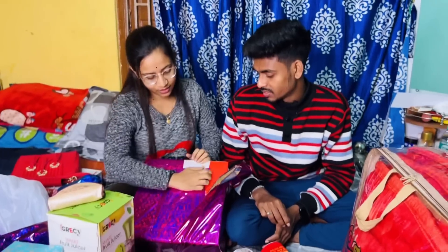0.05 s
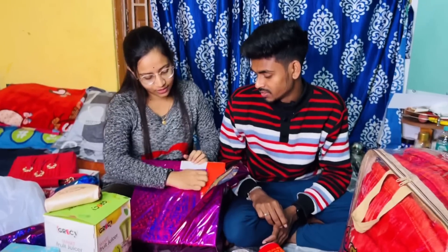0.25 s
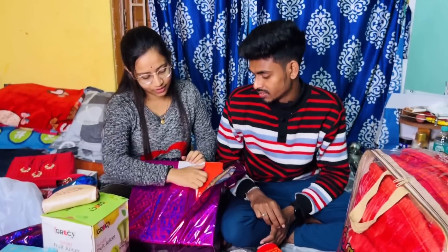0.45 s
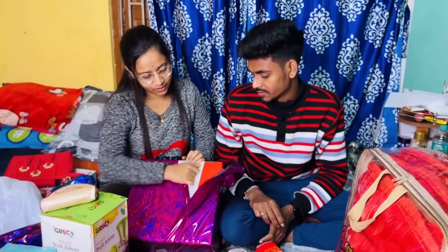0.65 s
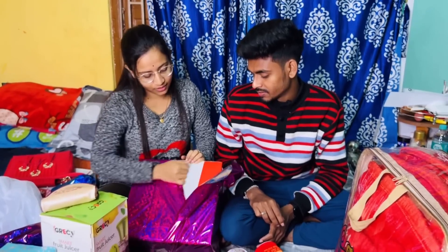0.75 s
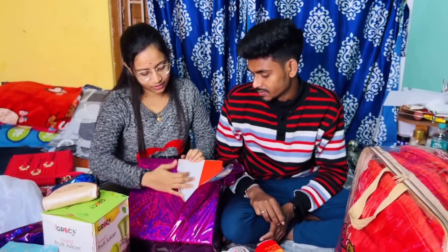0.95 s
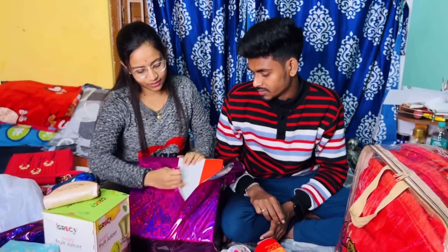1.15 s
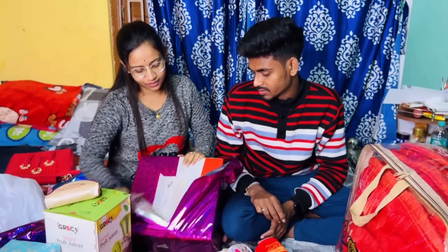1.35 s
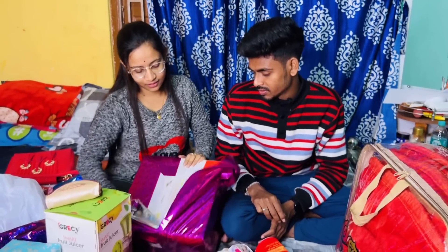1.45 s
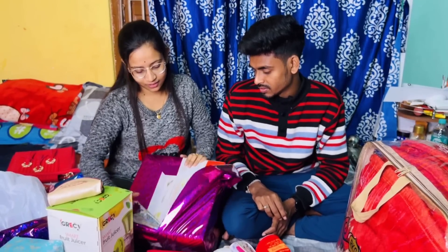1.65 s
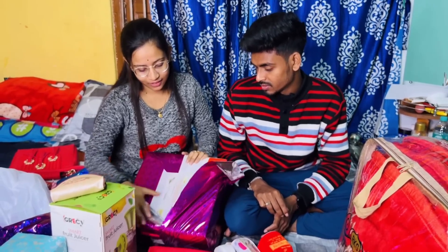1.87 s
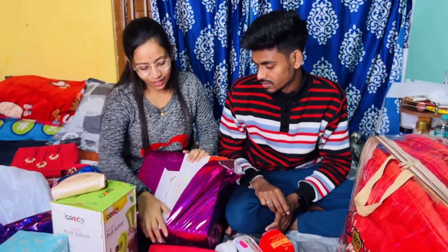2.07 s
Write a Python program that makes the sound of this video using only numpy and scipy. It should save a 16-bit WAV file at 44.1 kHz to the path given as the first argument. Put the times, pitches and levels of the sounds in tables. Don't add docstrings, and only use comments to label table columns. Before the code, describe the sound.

Foil gift wrap crinkles, snaps and tears sharply over soft box thumps in a small room

```python
import sys
import numpy as np
from scipy import signal
from scipy.fft import rfft, irfft
from scipy.io import wavfile

SR = 44100
rng = np.random.default_rng(int(sys.argv[2]) if len(sys.argv) > 2 else 0)


def unload_audio(sound):
    columns = np.transpose(np.atleast_2d(sound))
    steps = np.round(np.clip(columns, -1, 1) * 32767)
    wavfile.write(sys.argv[1], SR, steps.astype(np.int16))


def volts_from_decibels(level):
    exponent = np.asarray(level, float) / 20
    return 10 ** exponent


N = 93051
CLUMP_DB = 4


def rms_one(x):
    return x / np.sqrt(np.mean(x ** 2) + 1e-20)


def in_time(rows):
    s, *columns = np.transpose(rows)
    return [np.interp(np.arange(N) / SR, s, column) for column in columns]


def at_hz(points, hz):
    points_hz, values = np.array(points).T
    return np.interp(np.log(hz), np.log(points_hz), values)


def drift(rate_hz):
    r = np.exp(-2 * np.pi * rate_hz / SR)
    wander = signal.lfilter([1], [1, -2 * r, r * r], rng.standard_normal(N + SR))
    return rms_one(wander[SR:])


def ring(clicks, hz, t60_s):
    r = volts_from_decibels(-60 / (t60_s * SR))
    w = 2 * np.pi * hz / SR
    return signal.lfilter([0, np.sin(w)], [1, -2 * r * np.cos(w), r * r], clicks + 1e-18)


def high_pass(x, order, hz):
    return signal.sosfilt(signal.butter(order, hz, "high", fs=SR, output="sos"), x)


def colour(x, spectrum):
    hz = np.maximum(np.arange(N // 2 + 1) * SR / N, 10)
    lowest_hz, lowest_db = spectrum[0]
    points = [(lowest_hz / 2, lowest_db - 12)] + list(spectrum)
    return rms_one(irfft(rfft(x) * volts_from_decibels(at_hz(points, hz)), N))


def room_tone():
    # (frequency [Hz], density [dB per Hz])
    air_spectrum = [(60, -3), (100, 1), (200, -0.5), (350, 2.5), (600, -5), (1300, -12), (4000, -17.5),
                    (15000, -26.5)]
    return volts_from_decibels(-55 + 0.21 * drift(10)) * colour(rng.standard_normal(N), air_spectrum)


def room(x, cut_s):
    # (frequency [Hz], decay time T60 [s])
    room_decay = [(150, .4), (1000, .33), (4000, .33), (8000, .29), (15000, .21)]
    gap_s, build_s = 0.0027, 0.0074
    edges_hz = 60 * 2 ** np.arange(0, 8.3, 1 / 3)
    t = np.arange(SR) / SR
    white = rng.standard_normal((2, SR))
    tail = 0
    for k, (low, high) in enumerate(zip(edges_hz, edges_hz[1:])):
        band_pass = signal.butter(2, [low, high], "band", fs=SR, output="sos")
        band = signal.sosfilt(band_pass, white[k % 2])
        tail = tail + band * volts_from_decibels(-60 * t / at_hz(room_decay, np.sqrt(low * high)))
    tail = tail * np.clip((t - gap_s) / build_s, 0, 1) * np.clip((cut_s - t) / .01, 0, 1)
    return signal.fftconvolve(x, tail / np.sqrt(np.sum(tail ** 2)))[:N]


def slide():
    # (time [s], level [dB])
    drag = [
        (0, -58),
        (.03, -48.5),
        (.065, -38),
        (.13, -42),
        (.245, -56.5),
        (.26, -82),
    ]
    # (frequency [Hz], density [dB per Hz])
    cloth_spectrum = [(120, -29), (200, -14), (414, -8), (542, -13.5), (690, -9), (1060, -9), (5000, -28.5),
                      (6500, -57), (11000, -120)]
    level_db, = in_time(drag)
    return volts_from_decibels(level_db + 1.3 * drift(72)) * colour(rng.standard_normal(N), cloth_spectrum)


def thuds():
    # (time [s], level [dB], first pitch [Hz], last pitch [Hz], length [s])
    landings = [
        (.422, -44, 340, 250, .025),
        (.444, -40, 125, 100, .04),
        (.641, -25, 185, 105, .028),
        (1.001, -28, 165, 160, .034),
        (1.206, -34, 190, 95, .045),
        (1.878, -43, 150, 110, .03),
    ]
    out = np.zeros(N + SR)
    for s, db, first_hz, last_hz, length_s in landings:
        t = np.arange(int(length_s * SR)) / SR
        hz = first_hz + (last_hz - first_hz) * t / length_s
        swell = np.sin(np.pi * (t / length_s) ** 0.75)
        out[int(s * SR):][:len(t)] += volts_from_decibels(db) * swell * np.sin(2 * np.pi * np.cumsum(hz) / SR)
    return out[:N]


def bumps():
    # (time [s], level [dB], pitch struck [Hz], card rattle [dB], ring T60 [s])
    blows = [(.001, -32.5, 98, -14, 0.14), (0.055, -42, 280, -13, 0.2), (0.129, -43, 118, -10, 0.27),
             (0.166, -37.5, 280, -10, 0.13), (.21, -44, 277, -17, 0.23), (.35, -50, 290, -1, 0.26),
             (0.416, -38.5, 308, -14.5, 0.031), (0.445, -38.5, 113, -41, 0.14),
             (.647, -30.5, 245, 3.5, 0.25), (0.889, -40.5, 210, -12, 0.23), (1.003, -33.5, 146, -13, 0.44),
             (1.006, -38, 480, -13, 0.18), (.72, -44, 97, -18, 0.37), (1.852, -53.5, 200, -7, 0.13),
             (1.04, -38, 188, -5, 0.34), (1.21, -35.5, 115, -5, 0.35), (1.279, -27, 290, -7, 0.14),
             (1.332, -44.5, 88.5, -6.5, 0.17), (1.429, -51, 184, 3.5, 0.2), (1.55, -51, 248, -8, 0.36),
             (1.679, -52, 189, 5.5, 0.34), (1.877, -46, 154, 1, 0.25), (1.991, -54.5, 188, 8, 0.96)]
    # (frequency [Hz], level [dB], share of the ring time [1])
    box_modes = [(101.4, 3.5, 1.68), (153, 7.5, 0.92), (188, 2.5, 0.98), (241.7, -4, 1.44),
                 (282, 1.5, 1.37), (452.3, -4.5, 1.7), (529, 2.5, 2.15), (746, -9, 1.7), (869, 7.5, 1.4),
                 (944, 10, 0.48)]
    # (frequency [Hz], density [dB per Hz])
    card_spectrum = [(180, 0.5), (300, 6.5), (412, 0.5), (450, -1), (730, -2.5), (790, 1.5), (919, 1),
                     (1390, -10), (2000, -3), (2600, -16), (4400, -120)]
    attack_s, card_t60_s, tail_cut_s, reach_db_per_octave = .003, .4, 0.155, 13
    out = np.zeros(N + 8192)
    t = np.arange(8192) / SR
    shape = (1 - np.exp(-t / attack_s)) * np.clip((tail_cut_s - t) / 0.0083, 0, 1)
    card = colour(rng.standard_normal(N), card_spectrum)
    phases = rng.random((len(blows), len(box_modes)))
    for (s, db, struck_hz, card_db, t60_s), blow_phases in zip(blows, phases):
        body = 0
        for (hz, mode_db, share), phase in zip(box_modes, blow_phases):
            level_db = mode_db - reach_db_per_octave * abs(np.log2(hz / struck_hz))
            decay = volts_from_decibels(level_db - 60 * t / (t60_s * share))
            body = body + decay * np.sin(2 * np.pi * (hz * t + phase / 4))
        rattle = np.resize(card[int(s * SR):], 8192) * volts_from_decibels(card_db - 60 * t / card_t60_s)
        out[int(s * SR):][:8192] += volts_from_decibels(db) * (body + rattle) * shape
    return out[:N]


def crackle(brightness_db_per_octave, clump_db, denser=1):
    # (frequency [Hz], density [dB per Hz])
    foil_spectrum = [(500, -18.5), (1100, -34), (2300, -17), (4500, -0.5), (6500, 3.5), (9000, 0.5),
                     (13000, -0.5), (16000, 4)]
    buckles_per_s, spread_db, cycles = 5000, 3, 6.76
    sizes = volts_from_decibels(spread_db * np.minimum(rng.exponential(1, N), 2.8)) * rng.choice([-1, 1], N)
    born = rng.random(N) < denser * buckles_per_s * volts_from_decibels(clump_db * drift(40)) / SR
    pitches_hz = np.geomspace(500, 15500, 26)
    dealt = rng.integers(0, 26, N)
    weights = volts_from_decibels(at_hz(foil_spectrum, pitches_hz)) * np.sqrt(pitches_hz)
    panels_db = [2.5 * drift(14.0) for _ in range(7)]
    out = 0
    for k, (hz, weight) in enumerate(zip(pitches_hz, weights)):
        rings = rms_one(ring(sizes * born * (dealt == k), hz, cycles / hz))
        tilt_db = brightness_db_per_octave * np.log2(hz / 6000)
        out = out + weight * rings * volts_from_decibels(tilt_db + panels_db[k // 4])
    return high_pass(out, 2, 1000) / np.sqrt(np.sum(weights ** 2))


def rustle():
    # (time [s], level [dB], brightness [dB per octave])
    pull = [(0, -67, 3), (.045, -59, 5.5), (.23, -54.5, 5.5), (.37, -53, -11), (.45, -57, -7.5),
            (.57, -61.5, 2), (.585, -47, -2.5), (.78, -40.5, -5.5), (.89, -41, 0.5), (.99, -49.5, -5),
            (1.12, -43.5, -7), (1.23, -35, -8.5), (1.4, -37.5, -3.5), (1.6, -49.5, -4.5), (1.69, -45, -5),
            (1.84, -47, -7.5), (1.93, -40.5, -7), (2.11, -36.5, -9)]
    level_db, brightness = in_time(pull)
    surge_db = 1.0 * drift(15.0)
    return volts_from_decibels(level_db + surge_db) * crackle(brightness, CLUMP_DB)


def tugs():
    # (time [s], length [s], level [dB], brightness [dB per octave])
    tug_rows = [(0.346, 0.02, -44.5, -9.5), (.636, 0.013, -24.5, -4), (0.814, 0.012, -45.5, 3),
                (0.837, 0.023, -39.5, -5.5), (1.029, 0.019, -46, 0), (1.068, 0.04, -42, 0),
                (1.184, 0.1, -39, 0), (1.338, 0.084, -34.5, -3), (1.674, 0.024, -44.5, -0.5),
                (1.75, 0.031, -46.5, 4), (1.85, 0.032, -39.5, -10.5), (1.905, 0.064, -42.5, -4),
                (1.982, 0.022, -40.5, -6.5), (2.064, 0.037, -41.5, -5)]
    rise_s, fall_s = 0.0013, 0.0079
    t = np.arange(N) / SR
    shapes = []
    for s, length_s, db, _ in tug_rows:
        rise = np.clip((t - s) / rise_s, 0, 1)
        shapes.append(volts_from_decibels(db) * rise * np.exp(-np.maximum(t - s - length_s, 0) / fall_s))
    shapes = np.array(shapes)
    brightness = np.array(tug_rows)[shapes.argmax(axis=0), -1]
    return shapes.sum(axis=0) * crackle(brightness, CLUMP_DB)


def strip():
    hz, t60_s, centre_s, span_s = 1914, .06, 1.289, .014
    swell = np.exp(-.5 * ((np.arange(N) / SR - centre_s) / span_s) ** 2)
    return volts_from_decibels(-25.5) * rms_one(ring(rng.standard_normal(N), hz, t60_s)) * swell


def tear():
    start_s, crest_s, end_s = 1.2505, 1.264, 1.284
    level_db, rise_db, fall_db_per_s = -17.5, 2.0, 368
    t = np.arange(N) / SR
    before_crest = np.clip((crest_s - t) / (crest_s - start_s), 0, 1)
    db = level_db - rise_db * before_crest - fall_db_per_s * np.maximum(t - end_s, 0)
    brightness = 2.0 - 130 * np.clip(t - start_s, 0, .1)
    return volts_from_decibels(db) * (t > start_s) * crackle(brightness, clump_db=1.0, denser=3.0)


def snaps():
    # (time [s], peak [dB], pitch [Hz], length [ms], extra sent round the room [dB])
    creases = [(.0436, -37, 3600, 1.5, -3), (.1243, -34, 6000, 1.5, -4), (.5064, -39, 9000, 1.5, -4),
               (.595, -33, 9000, 1.5, -4), (.931, -29, 10000, 1.5, -4), (1.0522, -24, 6800, 2, -3),
               (1.161, -25, 9000, 2, -4), (1.6701, -29, 10000, 1.5, -4), (1.679, -28, 6000, 2, -2),
               (1.798, -29, 6000, 1.5, -4), (1.8622, -29, 12000, 2, -2), (2.0137, -25, 4000, 2, -3),
               (.3525, -27, 5200, 1.5, -1), (.5766, -25, 12000, 1.2, -4), (.6411, -7, 6300, 4, 0),
               (1.2652, -5, 6800, 2, -5), (1.2795, -3, 5500, 2.5, -4), (.8343, -22, 8000, 1.5, -3),
               (.8432, -20, 6000, 2, -1), (1.2415, -4, 6600, 1.5, -7), (1.2488, -4.5, 13000, .7, -3),
               (1.6325, -28, 11000, .7, -6), (1.7603, -23, 6000, 1.2, -3), (1.7632, -24, 6500, 1.2, -3),
               (.0722, -37, 9000, 1, -4), (1.02, -31, 13500, 1, -5), (1.193, -27, 12000, 1, -5),
               (1.487, -26, 10000, 1, -6), (1.852, -30, 5000, 2, -3), (1.9058, -27, 5400, 2, -2),
               (1.944, -26, 11000, 1, -5), (2.09, -24, 7500, 1.5, -4)]
    # (time [s], peak [dB], pitch [Hz], length [ms], extra to room [dB])
    catches = [
        (1.2545, -7, 5500, 1.5, -8),
        (1.2598, -9, 9000, 1, -8),
        (1.2632, -7, 11500, 1, -8),
        (1.2706, -1, 7200, .9, -8),
        (1.2735, -9, 4400, 1.5, -8),
        (1.2815, -7, 7000, 2.5, -8),
        (1.2878, -8, 7500, 1.2, -8),
        (1.2912, -8, 4500, 2, -8),
        (1.2994, -9, 6000, 1, -8),
        (1.326, -13, 4900, 2, -8),
    ]
    bursts = creases + catches
    peak_db = np.array([[9], [-7]])
    out = np.zeros((2, N + 2048))
    t = np.arange(2048) / SR
    click = 1. * (t == 0)
    for s, db, hz, ms, room_db in bursts:
        noise = rng.standard_normal(2048)
        burst = noise * np.exp(-(1000 * t / ms) ** 2) * np.clip(t / 0.00016, 0, 1)
        push = np.array([burst + 2.5 * click, click])
        push[0] = signal.lfilter(*signal.butter(1, min(1.5 * hz, .45 * SR), fs=SR), push[0])
        push = push + volts_from_decibels(peak_db) * signal.lfilter(*signal.iirpeak(hz, 2.5, fs=SR), push)
        ragged, even = map(rms_one, high_pass(push, 2, .5 * hz))
        pair = np.array([ragged, volts_from_decibels(room_db) * even]) / np.max(np.abs(ragged))
        start = int(s * SR)
        out[:, start:start + 2048] += volts_from_decibels(db) * pair
    return out[:, :N]


def scene():
    foil = rustle() + tugs()
    rip = tear()
    snap_near, snap_round = snaps()
    to_room = foil + volts_from_decibels(-3.0) * rip + snap_round
    echo = volts_from_decibels(2.5) * room(to_room, cut_s=.95)
    box = bumps() + thuds() + slide()
    return (foil + rip + snap_near + echo + strip() + box + room_tone())[None]


def roll_off(x):
    return signal.sosfilt(signal.butter(12, 17000, fs=SR, output="sos"), x)


def record(dry):
    ceiling = 1.3
    x = high_pass(ceiling * np.tanh(dry / ceiling), 3, 68)
    x = signal.sosfilt(signal.ellip(12, .5, 62, 15780, fs=SR, output="sos"), x)
    return roll_off(x)


dry = scene()
out = record(dry)
unload_audio(out)
```